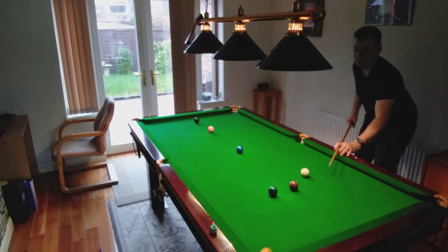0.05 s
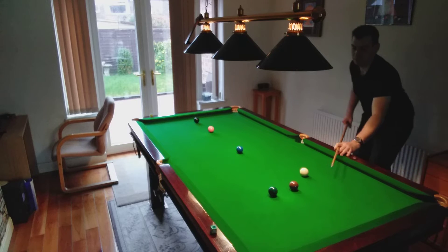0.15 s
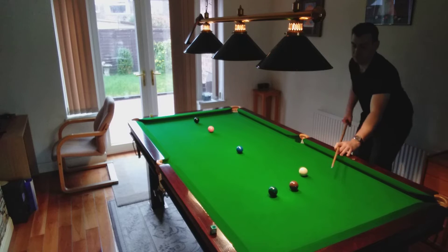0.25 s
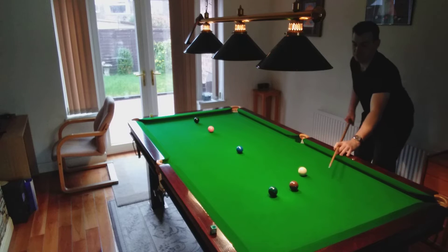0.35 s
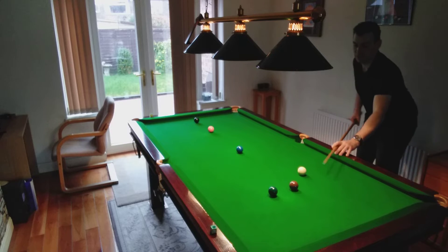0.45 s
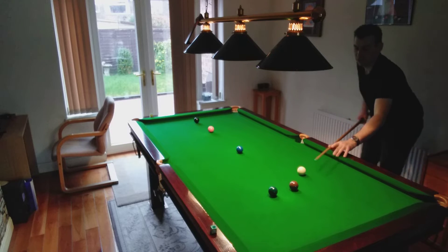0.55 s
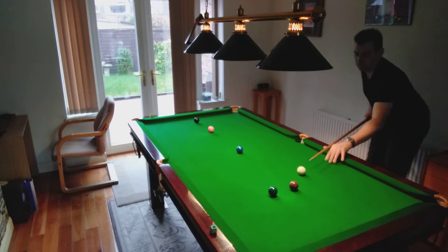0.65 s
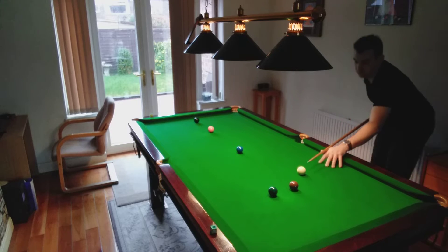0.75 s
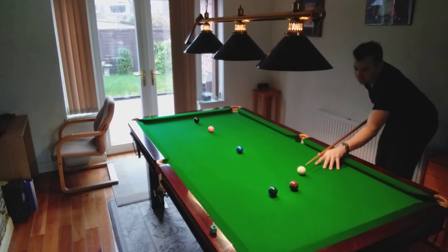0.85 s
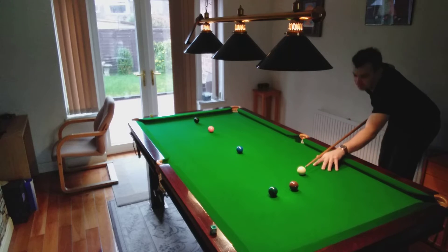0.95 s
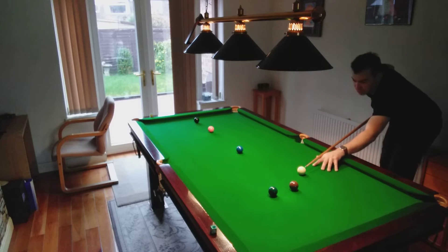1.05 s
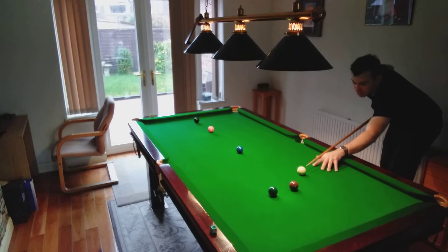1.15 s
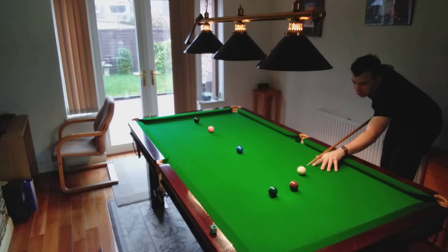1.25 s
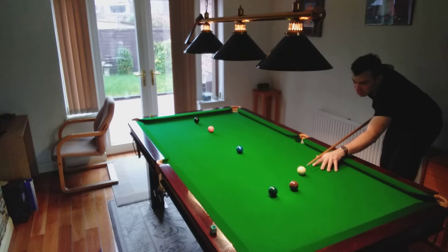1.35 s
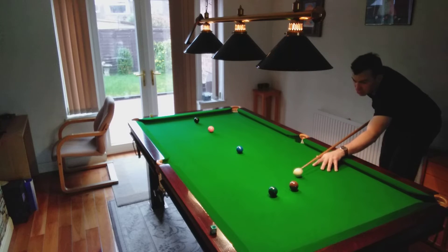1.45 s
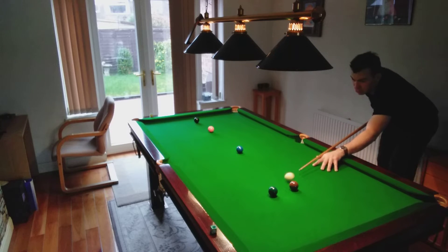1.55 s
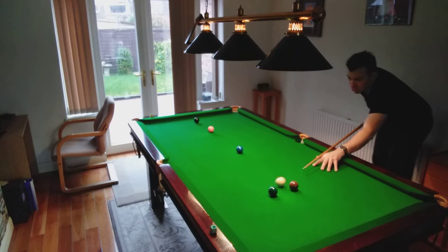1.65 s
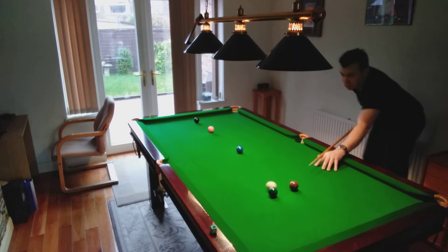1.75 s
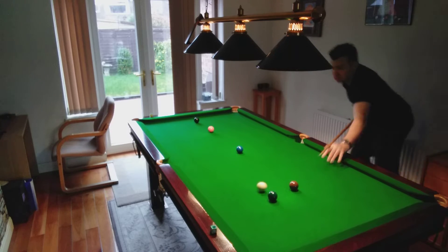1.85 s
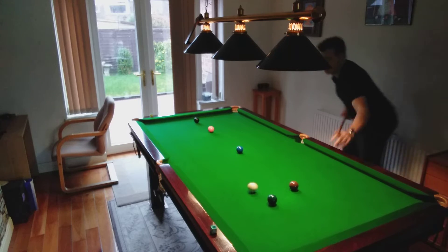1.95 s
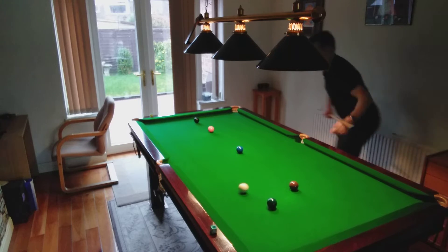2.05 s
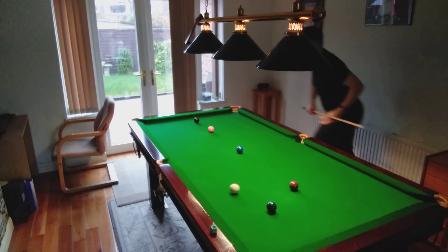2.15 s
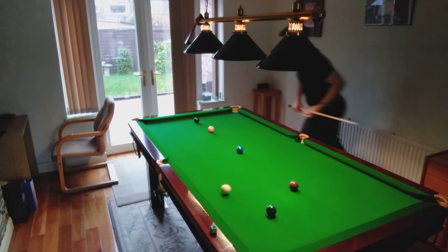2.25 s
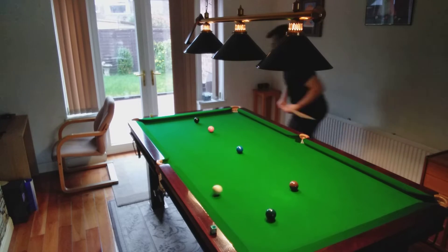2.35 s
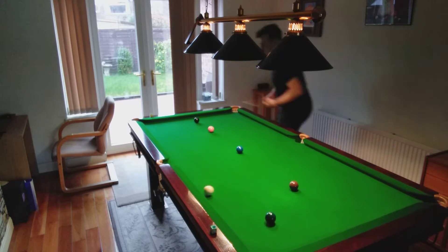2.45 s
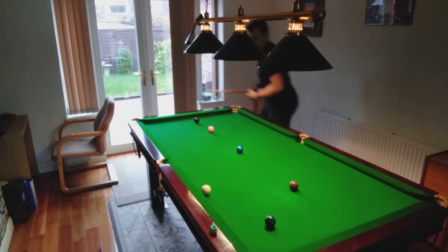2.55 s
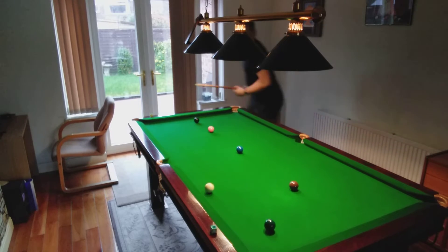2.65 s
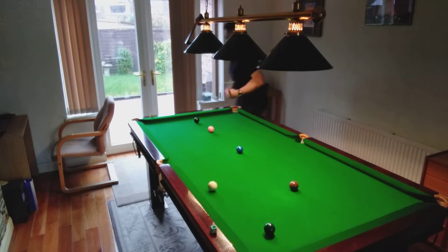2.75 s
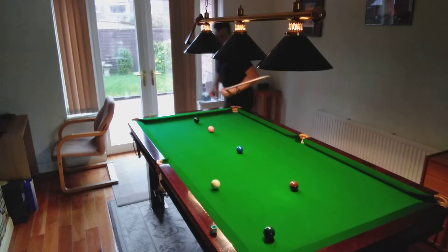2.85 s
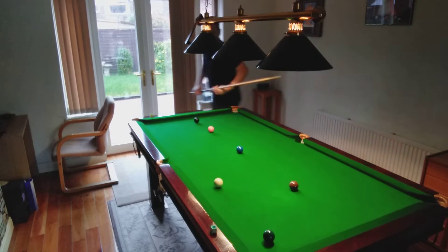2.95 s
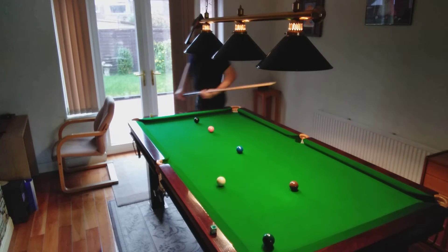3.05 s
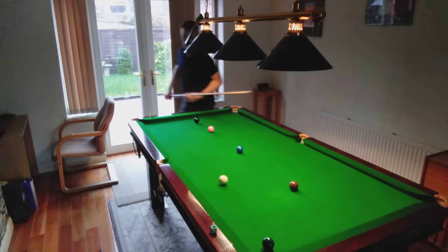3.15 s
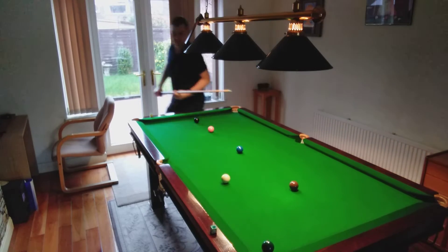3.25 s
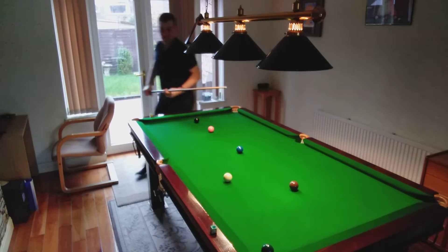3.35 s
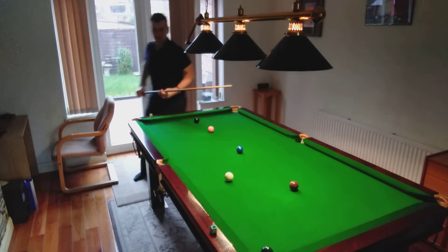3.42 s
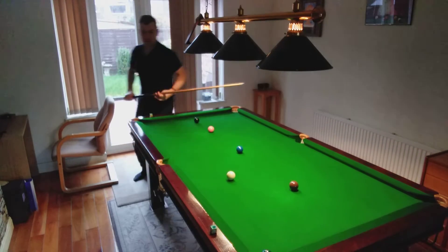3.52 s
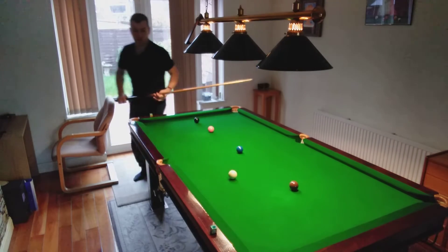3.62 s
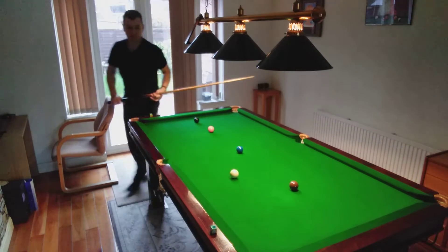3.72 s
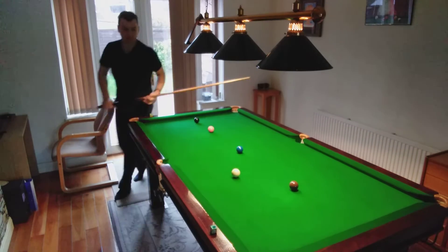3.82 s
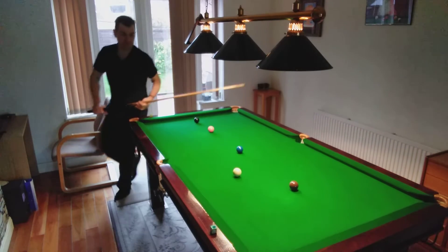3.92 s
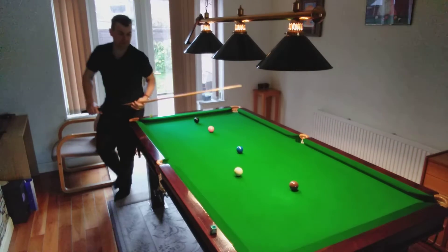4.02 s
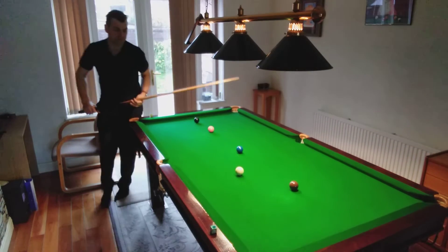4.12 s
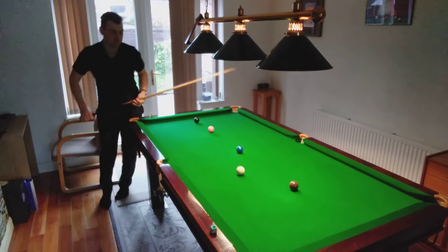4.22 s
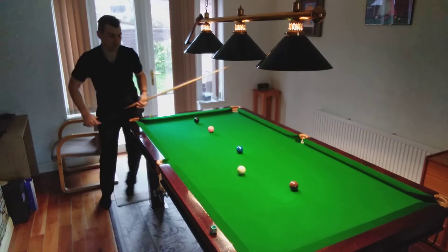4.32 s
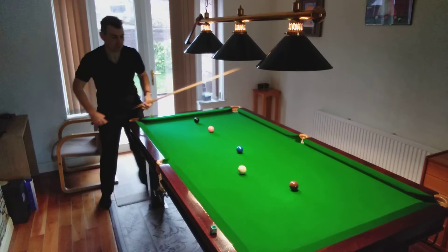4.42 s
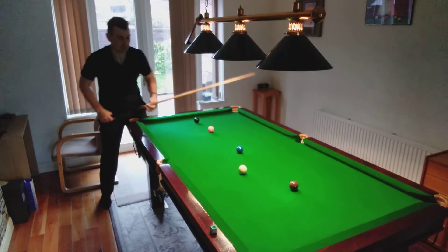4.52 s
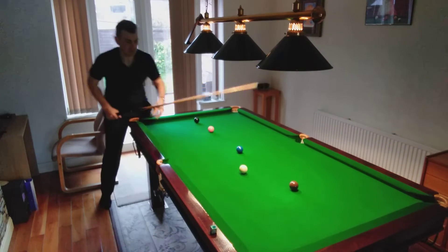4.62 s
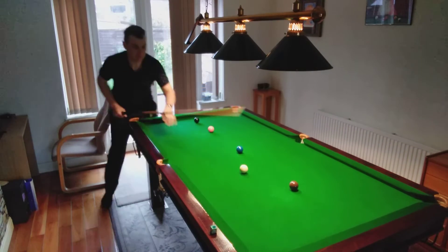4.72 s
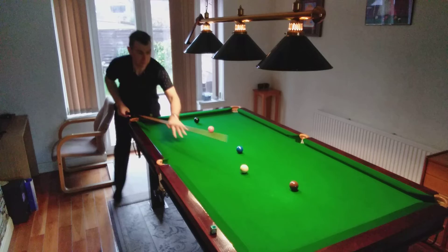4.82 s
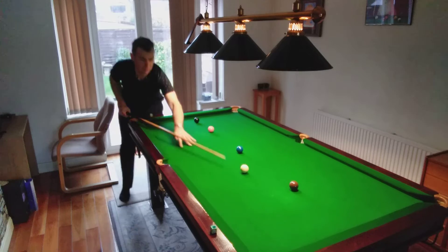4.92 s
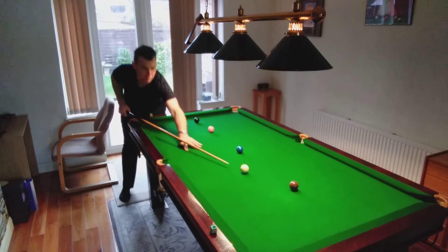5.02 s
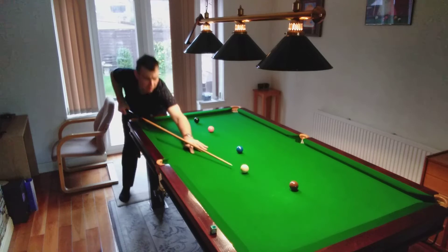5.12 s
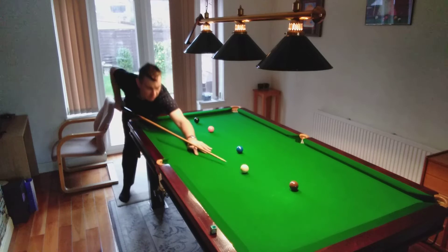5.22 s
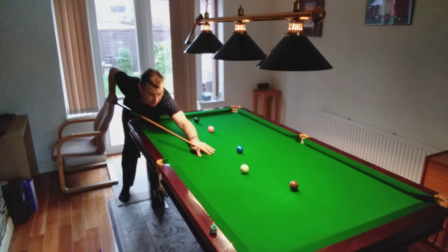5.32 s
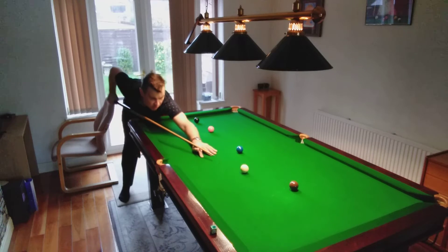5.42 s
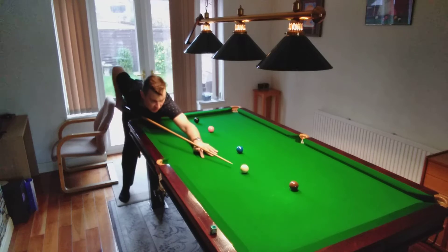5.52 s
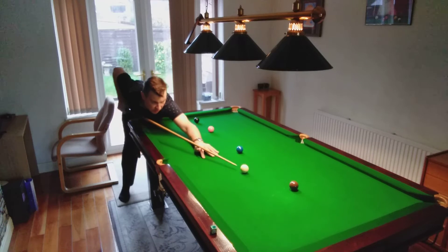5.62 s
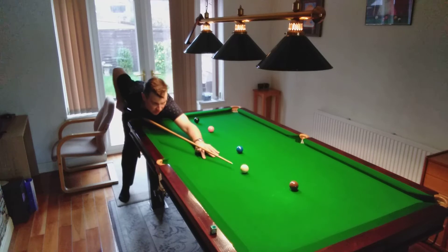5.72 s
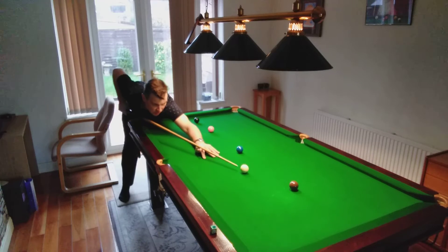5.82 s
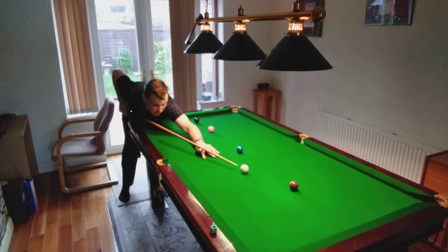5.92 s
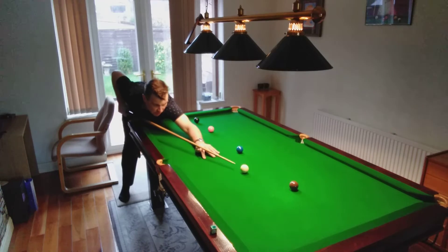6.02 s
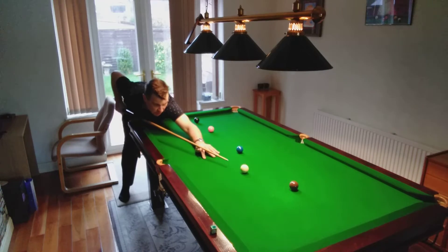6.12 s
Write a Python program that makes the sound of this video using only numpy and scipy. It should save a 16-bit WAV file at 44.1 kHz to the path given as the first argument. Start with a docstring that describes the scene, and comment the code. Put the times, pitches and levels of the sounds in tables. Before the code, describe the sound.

Mono pickup beside the table, hard reflections and a short room tail. Quick pocket knocks open, with rustles and a brief hand slide. The cue tip thuds with a hollow wooden ring, and a third of a second later two balls crack together. Dull steps move around under a thin roll; a cluster of pocket knocks ends in a bright ball clack, then a longer, hissy cloth slide settles into quiet.

```python
"""A small, hard-walled room with a snooker table, heard in mono. A potted ball snaps into a near pocket and onto
its runner; the player slides his bridge hand and strikes; the cue ball clacks into the black, which rolls into
the pocket and meets the ball waiting there, while he walks round the table and settles for the next shot.
Ball impacts are single force pulses, other knocks are bursts of tiny contacts, and the cue shaft is a sum of
decaying modes; steps, thuds and rustles are band-limited noise; rolls, slides, swishes and air are coloured noise."""
import sys
import numpy as np
from scipy import signal
from scipy.fft import rfft, irfft, next_fast_len
from scipy.io import wavfile

SR = 44100
rng = np.random.default_rng(int(sys.argv[2]) if len(sys.argv) > 2 else 0)


def transcribe(signal):
    """Save signal, clipped to [-1, 1], as a 16-bit WAV file at the path in sys.argv[1]."""
    frames = np.atleast_2d(signal).T
    limited = np.clip(frames, -1, 1)
    pcm = np.round(limited * 32767).astype(np.int16)
    wavfile.write(sys.argv[1], SR, pcm)


N = 272097
TIME = np.arange(N) / SR              # t/s of the whole scene
AGE = np.arange(SR * 4 // 5) / SR     # t/s since the start of one short sound
CUTOFF_HZ = 16000

# Still air of the room, spectrum: [f/Hz, level/dB]
AIR_COLOUR = [(20, -51), (32, -27), (45, -9.5), (85, -2), (120, -6.5), (165, -0.5), (210, -13),
              (300, -12.5), (450, -21), (800, -25), (2000, -30), (8200, -27), (9300, -32.5), (16000, -27)]
AIR_DB = -69
# Distinct reflections from table and walls: [delay t/s, level/dB]
REFLECTIONS = [(.0012, -3), (.0018, -14.5), (.0042, -2.5), (.0165, -5), (0.0195, -0.5), (.0246, -4),
               (.041, -6)]
# Reverberation time, the time to fall by 60 dB: [f/Hz, t60/s]
REVERBERATION = [(100, 0.61), (300, 0.54), (800, 0.45), (2000, 0.45), (4500, 0.39), (8000, 0.3),
                 (15000, 0.24)]

# Footfalls of the player: [t/s, level/dB, centre f/Hz, sole scuff level/dB]
FOOTFALLS = [(2.285, -57.5, 243, -75), (2.578, -50, 135.4, -76.5), (2.839, -60.5, 205, -81),
             (3.05, -62, 212, -70), (3.42, -60, 91, -70.5), (3.70, -63, 169, -87), (4.961, -59.5, 151, -89)]
STEP_DECAY_S, SCUFF_HZ, SCUFF_DECAY_S = 0.14, 997, 0.19
# Rub and rustle of sleeve and pocket net: [t/s, level/dB, centre f/Hz, decay t/s]
SLEEVE_RUSTLES = [(.15, -76, 690, 0.3), (.23, -61.5, 1100, .066), (.505, -55.5, 676, 0.054),
                  (.77, -60, 1030, 0.062), (.805, -62, 1440, 0.098), (.96, -69.5, 770, 0.072),
                  (3.54, -67, 1070, 0.049), (3.83, -73, 1090, 0.068)]
# Swishes of clothing: [middle t/s, level/dB, half length t/s (gain falls to 1/e)]
CLOTHES_SWISHES = [(.01, -66, 0.098), (1.326, -71, 0.12), (2.424, -62, 0.19), (2.89, -65.5, 0.04),
                   (3.186, -64, 0.21), (3.981, -63.5, 0.1), (4.154, -70, 0.08), (4.84, -63, 0.16)]

# Balls rolling, two spells on the cloth, then the potted black in the pocket's runner:
# [start t/s, end t/s, level/dB]
BALL_ROLLS = [(1.468, 1.8, -72.5), (1.8, 3.7, -60), (4.3, 4.552, -68.5)]
# Gain of a roll: (attack t/s, hold t/s, sag in dB/s as the ball slows, release in dB/s)
ROLL_GAIN = (.03, .25, 5.5, 75)
# Hiss of rolling balls and swishing clothes, spectrum: [f/Hz, level/dB]
ROLL_SPECTRUM = [(300, -1), (700, -8), (1700, -2.5), (2800, -0.5), (4400, 5.5), (6400, 3), (8200, 6),
                 (9200, -3.5), (11500, 0.5), (15800, -4)]

# Bridge hand sliding on the cloth: [start t/s, end t/s, hiss level/dB, firmest press t/s, palm level/dB]
HAND_SLIDES = [(0.707, 1.02, -57.5, 0.72, -68.5), (4.925, 5.774, -49.5, 5.225, -56)]
# Gain of a slide: (attack t/s, hold t/s, sag in dB/s, release in dB/s)
SLIDE_GAIN = (.032, .27, 17, 140)
# Nap under the hand, spectrum: [f/Hz, level/dB]
NAP_SPECTRUM = [(1000, -66), (2000, -13.5), (3000, -9), (4000, -2.5), (6000, -3), (8200, 0.5), (9300, -7.5),
                (12000, -2), (15800, -5)]
# Lower rub of the palm, spectrum: [f/Hz, level/dB]
PALM_SPECTRUM = [(300, -14), (700, -8.5), (1400, -4.5), (2500, -8.5), (4500, -9.5), (9000, -25.5)]
PALM_DB_PER_S = 50   # rate of swelling and fading round the firmest press

# Cue laid on the bridge hand: (t/s, level/dB)
TICK = (1.1295, -56)
# Dry tick of the cue on the hand, spectrum: [f/Hz, level/dB]
TICK_SPECTRUM = [(1000, -20), (2600, -5.5), (3800, -12), (5300, 1.5), (8200, -5), (11000, -20)]

# Low resonances of the table's frame and slate: [centre f/Hz, level/dB, decay t/s]
TABLE_RESONANCES = [(78.4, -9, .14), (160, -1, 0.073), (255, -4, 0.081)]
DROP_S = .022   # the thud follows a knock as the ball drops

# Sharp knocks of pocket, runner and cue: [t/s, level/dB, decay t/s, top edge f/Hz, table thud level/dB]
KNOCKS = [(0.2309, -62.5, 0.03, 2200, -55), (0.3318, -44, 0.017, 16000, -57),
          (0.383, -35, 0.0042, 17000, -74), (.4100, -21, 0.0056, 19600, -52),
          (0.6757, -38, 0.011, 14700, -62), (2.4018, -45.5, 0.021, 6400, -62.5),
          (4.1721, -34.5, 0.011, 16200, -50.5), (4.210, -36.5, 0.007, 15000, -57),
          (4.2435, -18.5, 0.0076, 14800, -44.5)]
# Common spectrum of the knocks, before tilt and top edge: [f/Hz, level/dB]
KNOCK_SPECTRUM = [(60, -26.5), (200, -6), (450, -5.5), (900, -6), (1700, -7.5), (2500, -6.5), (3500, -3),
                  (5500, -4), (8000, 1), (9500, -3), (14000, 0), (15900, -5.5)]
# Room level/dB of a knock at the reference level/dB, and its rise per dB below that
KNOCK_REF_DB, KNOCK_ROOM_DB, ROOM_PER_DB = -22, -0.5, 0.219
# Tilt in dB per octave at the reference top edge, and its rise per octave of top edge
TOP_REF_HZ, KNOCK_TILT_DB, TILT_PER_OCTAVE_DB = 16000, 1.55, 0.72

# Cue tip on the cue ball: (t/s, level/dB, table thud level/dB)
CUE_STROKE = (1.4695, -31.5, -42.5)
# Ringing modes of the cue shaft: [f/Hz, level/dB, t60/s]
SHAFT_MODES = [(136, -9.5, 0.48), (162.2, -7, 0.68), (232, 6, 0.39), (261.5, -7.5, 0.58), (465, -19, 0.67),
               (585, -32, 0.23), (676, -18, 0.51), (894, -21, 0.18), (1100, -15, 0.24), (1320, -17, 0.36),
               (1621, -6, 0.28), (2000, -15.5, 0.24), (2330, -16.5, 0.22), (2510, -24, 0.3),
               (2920, -33, 0.2), (3025, -36, 0.16), (3280, -23.5, 0.33), (3930, -27.5, 0.38)]

# Ball against ball: [t/s, peak level/dB, room level/dB, bright crack level/dB, table thud level/dB]
BALL_IMPACTS = [(1.7965, -14.5, 5, -30.5, -39.5), (4.5148, -22.5, 8.5, -16.5, -49.5)]
# Bright crack of the balls, spectrum: [f/Hz, level/dB]
CRACK_SPECTRUM = [(2000, -4), (4400, -6), (5200, -2.5), (6800, -8), (7600, -6), (8100, 1.5), (9000, -9),
                  (16000, -5)]


def amp(db):
    """Amplitude ratio is ten to the power of level over twenty."""
    return 10 ** (np.asarray(db) / 20)


def rms_one(x):
    """Dividing by the root mean square gives unit mean power."""
    return x / np.sqrt(np.mean(x ** 2) + 1e-20)


def at_hz(points, hz):
    """Interpolation is linear on a logarithmic frequency axis."""
    f, value = np.transpose(points)
    return np.interp(np.log(np.maximum(hz, 1)), np.log(f), value)


def cut(x, hz, kind, order=2):
    """Causal Butterworth filtering."""
    edges = np.clip(hz, 10, SR * .45)
    return signal.sosfilt(signal.butter(order, edges, kind, fs=SR, output="sos"), x)


def coloured(x, spectrum):
    """Spectral weighting shapes a steady signal by frequency; the result has rms 1."""
    size = next_fast_len(len(x))
    gain = amp(at_hz(spectrum, np.fft.rfftfreq(size, 1 / SR)))
    return rms_one(irfft(rfft(x, size) * gain, size)[:len(x)])


def grains(size, spread_db):
    """Friction is a multitude of tiny contacts of uneven strength."""
    strength = amp(spread_db * rng.standard_normal(size))
    return rng.standard_normal(size) * strength


def add(out, s, sound):
    """Superposition: a sound is added from its own moment."""
    start = max(round(s * SR), 0)
    out[start:start + len(sound)] += sound[:N - start]


def room_tail(spectrum, build_s):
    """Diffuse reverberation builds up, then decays sooner in the treble; energy 1."""
    hz = np.fft.rfftfreq(len(AGE), 1 / SR)
    noise = rfft(rng.standard_normal(len(AGE))) * amp(at_hz(spectrum, hz))
    centres, t60s = np.transpose(REVERBERATION)
    tail = 0
    for share, t60 in zip(np.eye(len(centres)), t60s):
        # overlapping bands, each cross-fading into its neighbours
        band = irfft(noise * at_hz(np.c_[centres, share], hz), len(AGE))
        tail = tail + band * amp(-60 * AGE / t60)
    tail = tail * (1 - np.exp(-AGE / build_s))
    return tail / np.linalg.norm(tail)


def in_room(pulse, room_db):
    """An impulse response joins direct sound, distinct reflections and a diffuse tail by convolution."""
    response = amp(room_db) * room_tail([(100, -2.1), (2000, 0.083), (16000, 1.0)], build_s=0.011)
    response[0] += 1   # direct sound
    for delay, db in REFLECTIONS:
        add(response, delay, amp([db]))
    return signal.fftconvolve(pulse, response)[:len(AGE)]


def contact(seconds, low_hz, top_hz):
    """Elastic contact is one smooth force pulse; a small body radiates little of its bass. Peak 1."""
    force = np.sin(np.pi * np.minimum(AGE / seconds, 1)) ** 2
    radiated = cut(force + 1e-18, low_hz, "high")
    pulse = cut(radiated, top_hz, "low", order=6)
    return pulse / np.abs(pulse).max()


def burst(spectrum, decay, room_db):
    """Tiny contacts excite a body of many uneven resonances; the reflections merge into one tail."""
    hz = np.linspace(50, CUTOFF_HZ, 240)
    unevenness_db = 2.2 * rng.standard_normal(len(hz))
    uneven = np.c_[hz, at_hz(spectrum, hz) + unevenness_db]
    direct = coloured(grains(len(AGE), spread_db=3.5), uneven) * np.exp(-AGE / decay)
    # the root scales the unit-energy tail to the expected energy of the decaying burst
    return direct + amp(room_db) * np.sqrt(decay * SR / 2) * room_tail(uneven, build_s=decay)


def bumps(table, width_ratio, rise_s):
    """Soft contacts stir a crowd of damped resonances, heard as decaying noise round a centre frequency."""
    out = np.zeros(N)
    for s, db, hz, decay in table:
        shape = (1 - np.exp(-AGE / rise_s)) * np.exp(-AGE / decay)
        band = [hz / width_ratio, hz * width_ratio]
        sound = cut(rng.standard_normal(len(AGE)), band, "band") * shape
        add(out, s, amp(db) * sound * np.linalg.norm(shape) / np.linalg.norm(sound))
    return out


def glide(start, end, shape):
    """Friction noise follows the motion over a surface: attack, hold, steady sag in dB, then release."""
    attack, hold, sag, release = shape
    age = np.maximum(TIME - start, 0)
    onset = 1 - np.exp(-age / attack)
    fall_db = sag * np.maximum(age - hold, 0) + release * np.maximum(TIME - end, 0)
    return onset * amp(-fall_db)


def room_air():
    """Steady background is stationary noise with a fixed spectrum."""
    return amp(AIR_DB) * coloured(rng.standard_normal(N), AIR_COLOUR)


def player():
    """Damped resonance: each footfall is a dull bump and a sole scuff; sleeve and pocket net rustle in between."""
    falls = [(s, db, hz, STEP_DECAY_S) for s, db, hz, _ in FOOTFALLS]
    scuffs = [(s, db, SCUFF_HZ, SCUFF_DECAY_S) for s, _, _, db in FOOTFALLS]
    steps = bumps(falls, width_ratio=1.38, rise_s=0.0084)
    soles = bumps(scuffs, width_ratio=1.56, rise_s=.012)
    rustles = bumps(SLEEVE_RUSTLES, width_ratio=1.3, rise_s=0.0045)
    return steps + soles + rustles


def rolls_and_swishes():
    """Friction noise: rolling balls hiss on cloth and runner, and moving clothes swish with the same spectrum."""
    rolling = sum(amp(db) * glide(start, end, ROLL_GAIN) for start, end, db in BALL_ROLLS)
    swishing = sum(amp(db) * np.exp(-((TIME - s) / half) ** 2) for s, db, half in CLOTHES_SWISHES)
    gain = np.hypot(rolling, swishing)   # powers add
    return gain * coloured(rng.standard_normal(N), ROLL_SPECTRUM)


def sliding_hand():
    """Friction noise: the nap hisses under the bridge hand, and the pressing palm adds a lower rub."""
    out = np.zeros(N)
    nap = coloured(grains(N, spread_db=3.0), NAP_SPECTRUM)
    palm = coloured(grains(N, spread_db=2.0), PALM_SPECTRUM)
    for start, end, hiss_db, press, palm_db in HAND_SLIDES:
        press_gain = amp(palm_db - PALM_DB_PER_S * np.abs(TIME - press))
        out = out + nap * amp(hiss_db) * glide(start, end, SLIDE_GAIN)
        out = out + palm * press_gain * (TIME > start)
    return out


def cue_tick():
    """Light impact of wood on the hand: a short, dry burst as the player lines up."""
    out, (s, db) = np.zeros(N), TICK
    add(out, s, amp(db) * burst(TICK_SPECTRUM, decay=0.003, room_db=2))
    return out


def table_thuds():
    """Forced excitation: every blow stirs the same low resonances of the table."""
    blows = [(row[0], row[-1]) for row in [CUE_STROKE, *BALL_IMPACTS]]
    blows += [(row[0] + DROP_S, row[-1]) for row in KNOCKS]
    rows = [(s, db + body_db, hz, decay) for s, db in blows for hz, body_db, decay in TABLE_RESONANCES]
    return bumps(rows, width_ratio=1.28, rise_s=.008)


def sharp_knocks():
    """Brief impacts spread in frequency: a lower top edge is also tilted duller; fainter knocks are more room."""
    out, (hz, colour_db) = np.zeros(N), np.transpose(KNOCK_SPECTRUM)
    for s, db, decay, top_hz, _ in KNOCKS:
        tilt_db = KNOCK_TILT_DB + TILT_PER_OCTAVE_DB * np.log2(top_hz / TOP_REF_HZ)
        room_db = KNOCK_ROOM_DB + ROOM_PER_DB * (KNOCK_REF_DB - db)
        top_loss_db = 10 * np.log10(1 + (hz / top_hz) ** 6)
        spectrum = np.c_[hz, colour_db + tilt_db * np.log2(hz) - top_loss_db]
        add(out, s, amp(db) * burst(spectrum, decay, room_db))
    return out


def cue_stroke():
    """Modal vibration: the leather tip knocks and scuffs; the shaft's ringing swells as it fills the room."""
    out, (s, db, _) = np.zeros(N), CUE_STROKE
    knock = amp(-5) * in_room(contact(.0012, low_hz=420, top_hz=1594), room_db=7.5)
    shaft = 0
    for hz, level, t60 in SHAFT_MODES:
        # reflections arriving in and out of step make each mode waver
        waver = rms_one(cut(rng.standard_normal(len(AGE)), 45, "low"))
        phase = 2 * np.pi * hz * AGE
        mode = np.sin(phase) + .5 * waver * np.cos(phase)
        shaft = shaft + amp(level - 60 * AGE / t60) * mode
    swell = 1 - np.exp(-(AGE / .03) ** 2)
    chalk_spectrum = [(300, -6), (1500, 0), (3500, -3), (7000, -11), (14000, -22)]   # [f/Hz, level/dB]
    scuff = burst(chalk_spectrum, decay=.018, room_db=9)
    add(out, s, amp(db) * (knock + amp(-1) * shaft * swell + amp(-24) * scuff))
    return out


def ball_clacks():
    """Elastic impact of hard balls, under half a millisecond: one pulse and a crack; the room does the ringing."""
    out = np.zeros(N)
    pulse = contact(seconds=.00041, low_hz=2700, top_hz=3800)
    for s, db, room_db, crack_db, _ in BALL_IMPACTS:
        crack = burst(CRACK_SPECTRUM, decay=0.0029, room_db=12.5)
        add(out, s, amp(db) * (in_room(pulse, room_db) + amp(crack_db) * crack))
    return out


def scene():
    """Superposition of all sources on and round the table, the same in both channels."""
    background = room_air() + player()
    friction = rolls_and_swishes() + sliding_hand()
    blows = cue_tick() + table_thuds() + sharp_knocks() + cue_stroke() + ball_clacks()
    mono = background + friction + blows
    return np.array([mono, mono])


def record(dry):
    """Band limitation: a steep elliptic low-pass removes the extreme treble."""
    return signal.sosfilt(signal.ellip(12, .1, 80, CUTOFF_HZ, fs=SR, output="sos"), dry)


dry = scene()
out = record(dry)
transcribe(out)
```